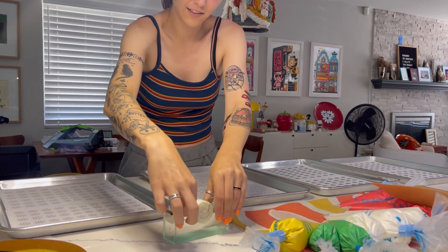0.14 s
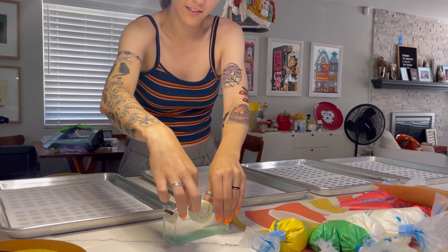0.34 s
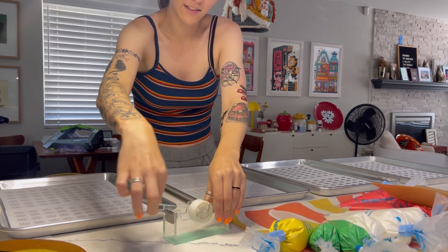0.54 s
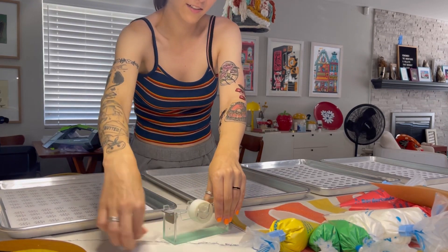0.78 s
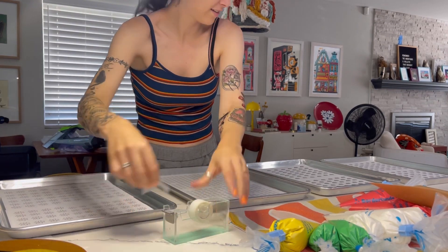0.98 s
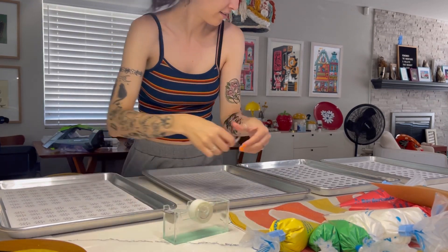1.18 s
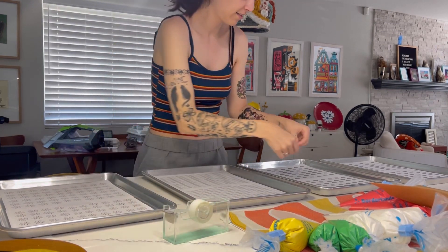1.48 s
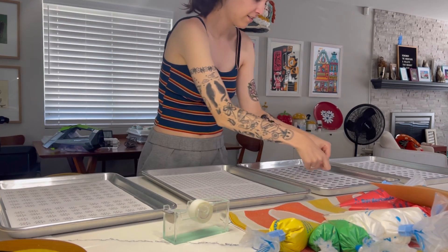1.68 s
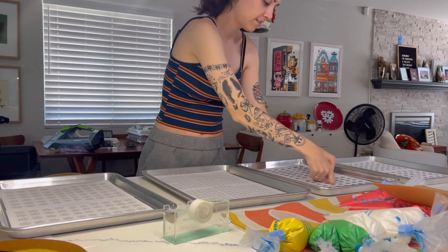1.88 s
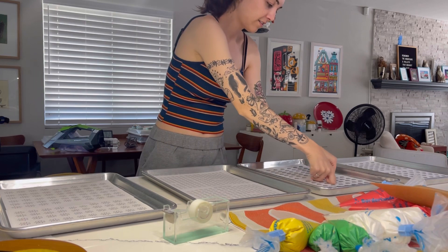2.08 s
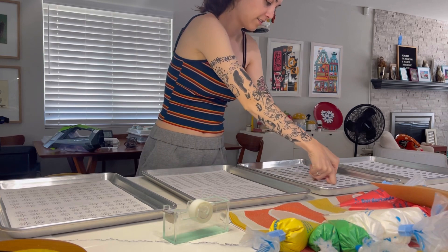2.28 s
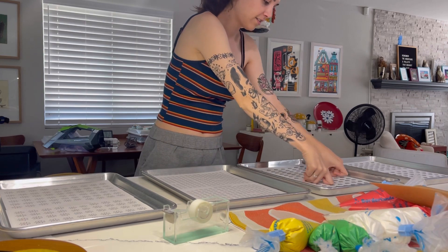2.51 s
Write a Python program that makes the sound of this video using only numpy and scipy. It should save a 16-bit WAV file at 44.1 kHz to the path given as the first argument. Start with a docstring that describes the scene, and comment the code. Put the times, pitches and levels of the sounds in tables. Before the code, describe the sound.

Adhesive tape is picked, pulled and torn from a plastic dispenser with sharp snaps, short rips and dull table knocks; then the loose strip crackles sparsely farther off, in a lively kitchen with low hum, on a phone.

```python
"""A fridge and fan hum throughout: wavering motor tones over shaped noise, partly alike in two ports.
In the first second tape is picked at, pulled and torn off a plastic dispenser on a table: noise bursts
snap, dense clicks rip, both ring the dispenser and a lively room; damped modes knock on the table.
Then the free strip snaps and crackles in the hands and on baking sheets, with more room and no dispenser
ring. Soft noise rustles come and go. A phone with two microphone ports, resonant in the treble, listens."""
import sys
import numpy as np
from scipy import signal
from scipy.fft import rfft, irfft, next_fast_len
from scipy.io import wavfile

SR = 44100
rng = np.random.default_rng(int(sys.argv[2]) if len(sys.argv) > 2 else 0)


def undo_db(level):
    """Turn decibels back into plain size, where 20 dB means ten times bigger."""
    steps = np.asarray(level, float) / 20
    return 10 ** steps


def generate_wav(sig):
    """Save sig (samples, or channels by samples) to the path in sys.argv[1] as 16-bit PCM at SR."""
    pcm = np.round(np.clip(np.atleast_2d(sig).T, -1, 1) * 32767).astype(np.int16)
    wavfile.write(sys.argv[1], SR, pcm)


N = 116865
SIZE = next_fast_len(N + SR)   # FFT length with space for the room tail
HZ = np.arange(SIZE // 2 + 1) * SR / SIZE
EVENT_S = np.arange(4096) / SR   # clock within one snap or rip


def rms_one(x):
    """Scale to rms 1."""
    return x / np.sqrt(np.mean(x ** 2) + 1e-20)


def at_hz(points, hz):
    """Read a (f/Hz, value) table on a log-frequency axis."""
    p = np.array(points, float)
    return np.interp(np.log(hz + 1), np.log(p[:, 0] + 1), p[:, 1])


def band(x, low_hz, high_hz):
    """Butterworth band-pass."""
    sos = signal.butter(2, [low_hz, high_hz], "band", fs=SR, output="sos")
    return signal.sosfilt(sos, x + 1e-18)


def ring(x, hz, t60_s):
    """Damped mode: a unit click sets off a decaying sine of initial height 1."""
    r = undo_db(-60 / (t60_s * SR))
    w = 2 * np.pi * hz / SR
    return signal.lfilter([0, np.sin(w)], [1, -2 * r * np.cos(w), r * r], x + 1e-18)


def drift(corner_hz):
    """Slow random wander of rms 1: noise through two equal poles, computed every 40 samples."""
    r = np.exp(-2 * np.pi * corner_hz * 40 / SR)
    noise = rng.standard_normal(N // 40 + 2002)
    slow = signal.lfilter([1], [1, -2 * r, r * r], noise)[2000:]
    return np.interp(np.arange(N) / 40, np.arange(len(slow)), rms_one(slow))


def diffuse():
    """Spectra of white noise for the two ports, partly alike."""
    # likeness of diffuse sound in the two ports: f/Hz, correlation/0-1
    likeness = [(30, 1), (100, .92), (300, .65), (700, .55), (1500, .25), (3000, .5), (6800, .5),
                (8000, .88), (10300, .97), (12000, .7)]
    mid, side = rfft(rng.standard_normal((2, SIZE)))
    alike = at_hz(likeness, HZ)
    return np.sqrt(1 + alike) * mid + np.sqrt(1 - alike) * side * [[1], [-1]]


def air():
    """Fan and room noise: diffuse noise shaped to a spectrum, then set to -53 dB rms."""
    # noise spectrum: f/Hz, relative level/dB
    spectrum = [(25, -53), (40, -18), (60, -3.5), (93, -9.5), (130, -1), (216, -12.5), (364, -15.5),
                (600, -19.5), (977, -23), (1400, -28), (2100, -34), (3400, -38), (5000, -45), (7500, -47),
                (9600, -37.5), (10400, -88), (11200, -79), (13000, -107), (18000, -110)]
    noise = irfft(diffuse() * undo_db(at_hz(spectrum, HZ)), SIZE)[:, :N]
    return undo_db(-53) * rms_one(noise)


def hum():
    """Motor tones whose level and phase waver."""
    # motor tones: f/Hz, rms level without waver/dB
    tones = [(59.2, -50.5), (118.4, -52), (188.4, -62.5), (247.6, -64.5), (479.1, -67)]
    # level waver of each tone: rms/dB
    wavers_db = [.5, 1.9, 1.47, 2.7, 0.35]
    t = np.arange(N) / SR
    out = np.zeros(N)
    for (hz, db), waver_db in zip(tones, wavers_db):
        level = np.sqrt(2) * undo_db(db + waver_db * drift(14.5))
        phase_rad = 2 * np.pi * (hz * t + rng.random()) + 0.27 * waver_db * drift(3.3)
        out += level * np.sin(phase_rad)
    return out


def knocks():
    """Dull knocks: each push rings two table modes, a fifth apart."""
    # knocks on the table: t/s, peak of each undamped mode/dB, lower mode f/Hz, t60/s
    strokes = [(0.309, -49, 433, 0.07), (.372, -45.5, 333, 0.11), (.375, -46, 540, 0.09),
               (0.601, -48, 181.5, 0.38), (.6, -52, 700, 0.059), (.62, -47.5, 380, 0.056),
               (.775, -44.5, 90, 0.13), (0.769, -52.5, 319, 0.12), (1.484, -44, 685, 0.049),
               (1.483, -41.5, 1185, 0.033), (.75, -47, 1160, 0.055)]
    out = np.zeros(N)
    for s, db, hz, t60_s in strokes:
        push = np.zeros(N)
        push[int(s * SR)] = undo_db(db)
        out += ring(push, hz, t60_s) + ring(push, 1.5 * hz, t60_s)
    return out


def rustles():
    """Tape and fingers rustle: Gaussian swells of grainy noise in a high and a low band."""
    # rustles: centre t/s, full width at 1/e/s, high-band rms at the peak/dB, low band re high/dB
    swells = [(0.071, 0.048, -66.5, -16), (.45, .1, -67, 4), (0.511, .1, -59, 6.5), (0.657, .06, -68, -11),
              (1.205, 0.068, -77.5, -11), (1.28, 0.042, -73, -36), (1.928, 0.1, -81.5, -27),
              (2.024, 0.043, -69.5, -27), (2.49, 0.089, -69.5, -14), (2.64, 0.016, -89, -13)]
    t = np.arange(N) / SR
    high_gain, low_gain = np.zeros((2, N))
    for s, width_s, high_db, low_re_high_db in swells:
        bump = np.exp(-(2 * (t - s) / width_s) ** 2)
        high_gain += undo_db(high_db) * bump
        low_gain += undo_db(high_db + low_re_high_db) * bump
    grain_db = 3.9 * np.minimum(rng.exponential(1, N), 5) + 3.1 * drift(40)
    grains = rng.standard_normal(N) * undo_db(grain_db)
    return high_gain * rms_one(band(grains, 5200, 9600)) + low_gain * rms_one(band(grains, 690, 1670))


def voiced(burst, presence_db, body_db, on_dispenser):
    """Colour a burst as treble, presence and body; rows: direct, room feed (a click of equal energy)."""
    # dispenser resonances: f/Hz, relative level/dB, t60/s
    modes = [(924, 2, 0.013), (1230, 11, 0.013), (1616, -1, .02), (1870, -3, 0.05), (2300, -5.5, 0.022),
             (3280, -9, .02), (4750, -13.5, 0.017)]
    click = np.zeros(len(burst))
    click[0] = np.sqrt(np.sum(burst ** 2))
    room_db = 0 if on_dispenser else 3.5   # the strip is farther off: more room
    feed = undo_db(room_db) * band(band(click, 150, 10000), 100, 11500)
    x = np.array([burst, feed])
    if on_dispenser:
        presence = band(x, 2700, 7580)
        body = undo_db(9.5) * band(x, 1000, 2350)
        for hz, db, t60_s in modes:
            mode_db = db - 24 + 2 * rng.normal()   # scatters from event to event
            body += undo_db(mode_db) * ring(x, hz, t60_s)
    else:
        presence = band(x, 3680, 8000)
        body = band(x, 950, 3440)
    treble = band(x, 7300, 18500)
    return treble - undo_db(presence_db + 2) * presence + undo_db(body_db + 12.5) * body


def rips():
    """Tape rips along the blade or crackles: dense random clicks fading 7 dB; rows: direct, room feed."""
    # rips at the dispenser: start t/s, end t/s, rms click height before colouring/dB,
    # presence/dB and body/dB re treble, before the fixed gains in voiced()
    blade_rips = [(.216, .223, -35.5, -7, -24), (.275, .288, -29.5, -25, -9.5),
                  (.307, .319, -37, -33, -1.5), (.369, .38, -34.5, -20, -8), (.6, .625, -60.5, -3, -7),
                  (.74, .747, -45, 7, -15), (.748, .765, -26.5, -11.5, -20), (.767, .778, -29, 4, -15.5),
                  (.972, .98, -41.5, 1, -32)]
    # crackles of the free strip: same columns
    strip_crackles = [(1.408, 1.414, -48, -17, -8.5), (1.482, 1.51, -37, -2, -7.5),
                      (2.169, 2.176, -32, -4.5, -18.5), (2.18, 2.192, -35.5, 5.5, -24),
                      (2.354, 2.366, -37.5, -8, -21.5), (2.37, 2.38, -42, -0.5, -13)]
    clicks_per_s = 5000
    out = np.zeros((2, N))
    for table, on_dispenser in (blade_rips, True), (strip_crackles, False):
        for start_s, end_s, db, presence_db, body_db in table:
            length_s = end_s - start_s
            hits = rng.random(len(EVENT_S)) < clicks_per_s / SR
            fade = undo_db(-7 * EVENT_S / length_s) * (EVENT_S < length_s)
            clicks = hits * rng.standard_normal(len(EVENT_S)) * fade
            # energy of the expected number of unit clicks
            clicks *= np.sqrt(length_s * clicks_per_s / (np.sum(clicks ** 2) + 1e-9))
            i = int(start_s * SR)
            out[:, i:i + len(EVENT_S)] += undo_db(db) * voiced(clicks, presence_db, body_db, on_dispenser)
    return out


def snaps():
    """Adhesive lets go in snaps: random-sign bursts that die exponentially; rows: direct, room feed."""
    # snaps of tape and nail at the dispenser: t/s, level before colouring and a 4 dB cut/dB,
    # presence/dB and body/dB re treble before the fixed gains in voiced(), 1/e decay/ms
    dispenser_snaps = [(0.0515, -46, -21, 1, 0.73), (0.0904, -50.5, -17, 6.5, 0.6),
                       (0.1425, -35.5, -16, -6.5, 0.33), (0.2156, -26.5, -16, -18, 1),
                       (0.2731, -14.5, -33, -12.5, 0.32), (0.2771, -9.5, -14, -17.5, 1),
                       (0.3065, -18.5, -5, -42, 0.56), (0.367, -8, -21, -22.5, 0.41),
                       (0.3739, -25.5, -15, -12.5, 1), (0.616, -34, -21, -9, 0.73),
                       (0.6606, -39, -6, -13, 0.42), (0.6888, -30.5, -5, -17.5, 0.3),
                       (0.7478, -23, -4, -15.5, 0.4), (0.7667, -20.5, 4.5, -28, 0.77),
                       (0.8039, -25, -20, -19.5, 0.43), (0.9695, -36, -15, -17, 1)]
    # snaps of the free strip in the hands and on the sheets: same columns
    strip_snaps = [(1.2639, -56, 1, 5, 0.6), (1.4127, -26.5, -17, -10.5, 0.4),
                   (1.482, -25.5, -0.5, -18.5, 0.27), (2.0085, -58, -20, -20, 0.34),
                   (2.1675, -17.5, -2, -16, 0.82)]
    out = np.zeros((2, N))
    for table, on_dispenser in (dispenser_snaps, True), (strip_snaps, False):
        for s, db, presence_db, body_db, decay_ms in table:
            burst = rng.choice([-1, 1], len(EVENT_S)) * np.exp(-EVENT_S * 1000 / decay_ms)
            i = int(s * SR)
            out[:, i:i + len(EVENT_S)] += undo_db(db - 4) * voiced(burst, presence_db, body_db, on_dispenser)
    return out


def unit_energy(reply):
    """Scale a two-port impulse response to mean energy 1."""
    return reply / np.sqrt(np.mean(np.sum(reply ** 2, axis=1)))


def room(direct, feed):
    """Direct sound with a table echo, plus quick scatter and a tail that dies band by band."""
    # reverberation: f/Hz, t60/s
    decay = [(500, 0.31), (1300, 0.32), (3500, 0.44), (7000, 0.37), (13000, 0.27)]
    t = np.arange(SR) / SR
    white = irfft(diffuse(), SIZE)[:, :SR]
    edges_hz = 150 * 2 ** np.arange(0, 7.1)   # octaves
    tail = np.zeros_like(white)
    for k, (low_hz, high_hz) in enumerate(zip(edges_hz, edges_hz[1:])):
        t60_s = at_hz(decay, np.sqrt(low_hz * high_hz))
        tail += (-1) ** k * band(white, low_hz, high_hz) * undo_db(-60 * t / t60_s)
    early = white * undo_db(-60 * t / 0.027)   # t60 27 ms
    fade_in = np.minimum(t / 0.0018, 1)
    reply = (undo_db(-3) * unit_energy(tail) + unit_energy(early)) * fade_in
    echo_s, echo_db = 0.0053, -11
    echo = 1 + undo_db(echo_db) * np.exp(-2j * np.pi * HZ * echo_s)
    return irfft(rfft(direct, SIZE) * echo + rfft(feed, SIZE) * rfft(reply, SIZE), SIZE)[:, :N]


def port_colour(x):
    """Minimum-phase microphone colour with a treble resonance, via the folded cepstrum."""
    # colour of the ports: f/Hz, gain/dB
    gain = [(600, -14.5), (1000, -3.5), (2000, -2), (3800, -4), (5500, 1.5), (7500, 2), (9000, 12.5),
            (10300, 14), (11300, 3), (12500, -8), (13700, -38), (15200, -19), (16500, -44)]
    cepstrum = irfft(at_hz(gain, HZ) * np.log(10) / 20, SIZE)
    cepstrum[1:SIZE // 2] *= 2
    cepstrum[SIZE // 2 + 1:] = 0
    return irfft(rfft(x, SIZE) * np.exp(rfft(cepstrum)), SIZE)[:, :N]


def scene():
    """Tape, coloured by the ports, and knocks in the room over hum and air."""
    direct, feed = snaps() + rips() + rustles()
    thuds = knocks()
    return port_colour(room(direct, feed)) + room(thuds, thuds) + hum() + air()


def top_cut(x):
    """Nothing passes above the cut-off."""
    return signal.sosfilt(signal.butter(12, 16840, fs=SR, output="sos"), x)


def record(dry):
    """Two ports that differ in sensitivity and phase, each taking half the difference."""
    # phase of first port re second: f/Hz, lead/rad
    phase = [(0, 0), (1300, -.1), (2700, .9), (4800, .8), (6300, .2), (7500, .9), (8200, .3), (8900, -.85),
             (9600, -2.25), (10300, -3.14), (11000, -4.4), (11700, -5.8), (13000, -7.5), (22050, -7.5)]
    # sensitivity of first port re second: f/Hz, level/dB
    balance = [(40, 1), (100, 5.5), (300, 2), (700, 3.5), (2700, 3), (3800, 3.5), (4800, 6.5), (6800, 4),
               (7500, 13), (8300, -4), (9000, 1), (16000, -1)]
    lead_rad = np.interp(HZ, *np.transpose(phase))
    gain = undo_db(at_hz(balance, HZ) * [[.5], [-.5]])
    turn = np.exp(.5j * lead_rad * [[1], [-1]])
    mix = irfft(rfft(dry, SIZE) * gain * turn, SIZE)[:, :N]
    return top_cut(mix)


dry = scene()
out = record(dry)
generate_wav(out)
```